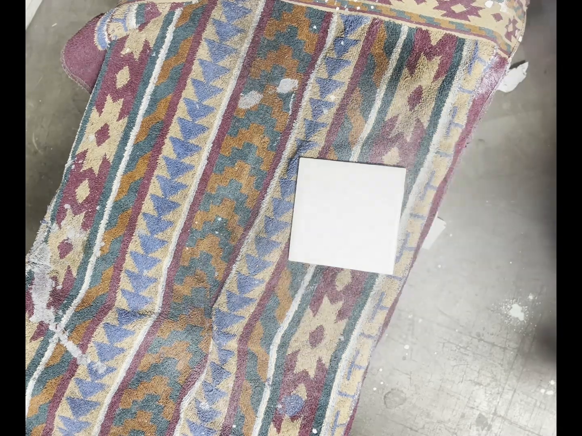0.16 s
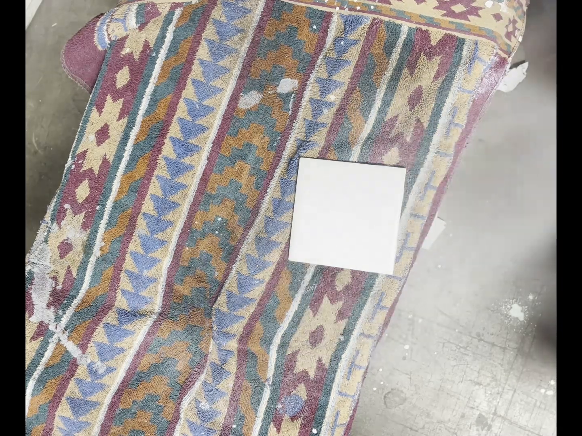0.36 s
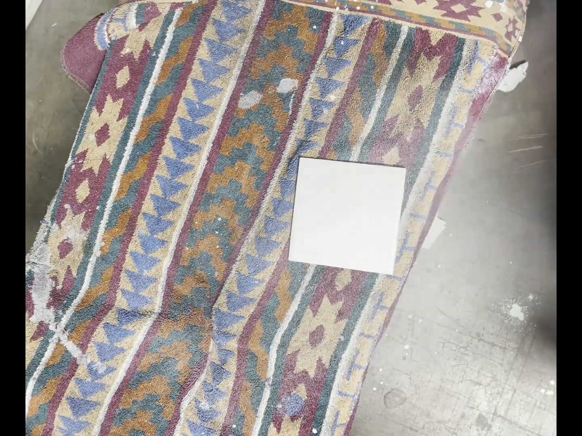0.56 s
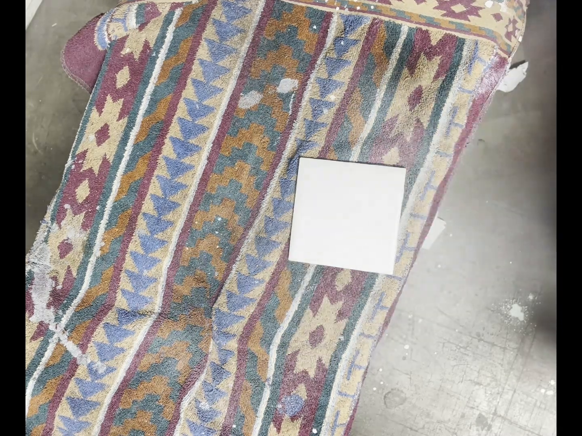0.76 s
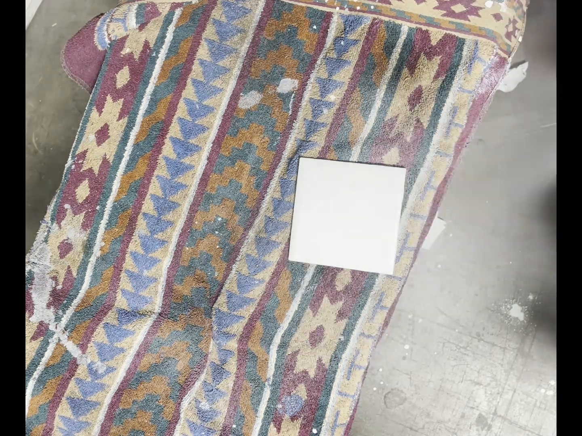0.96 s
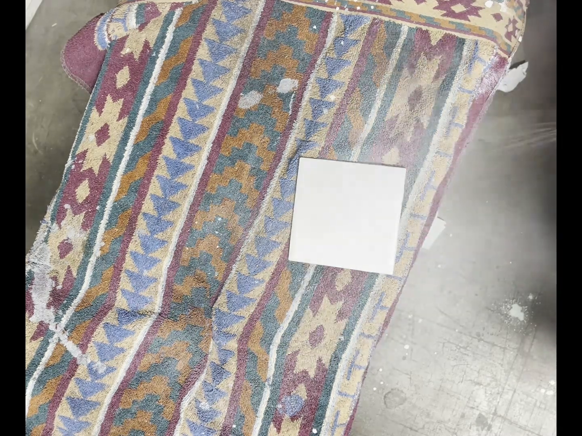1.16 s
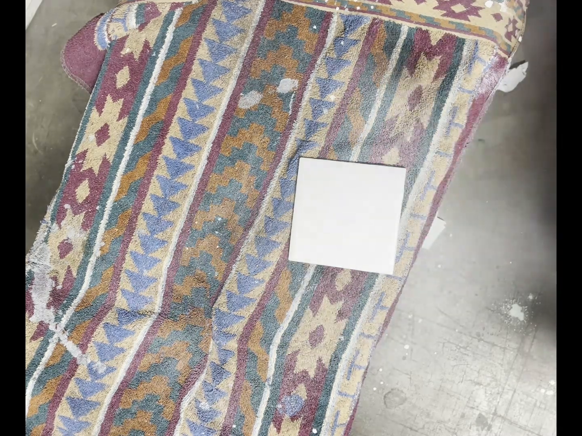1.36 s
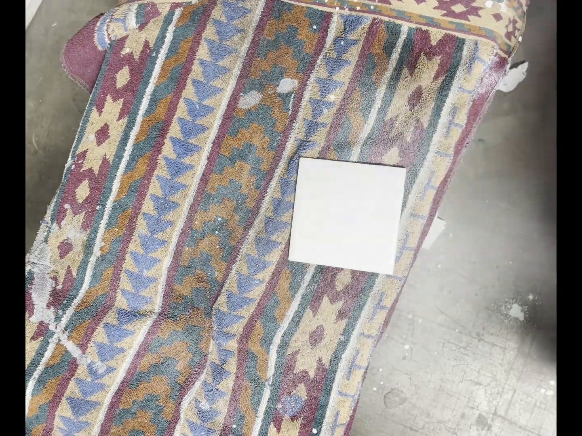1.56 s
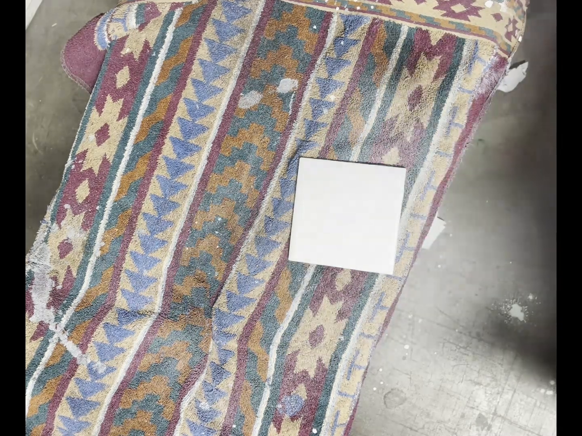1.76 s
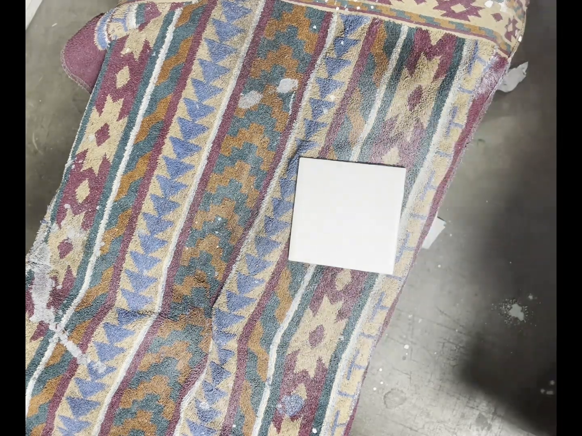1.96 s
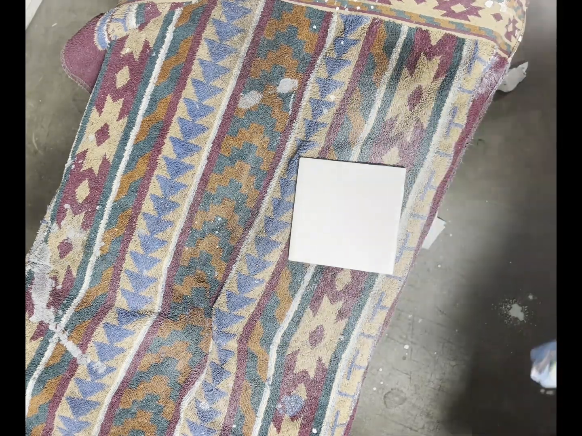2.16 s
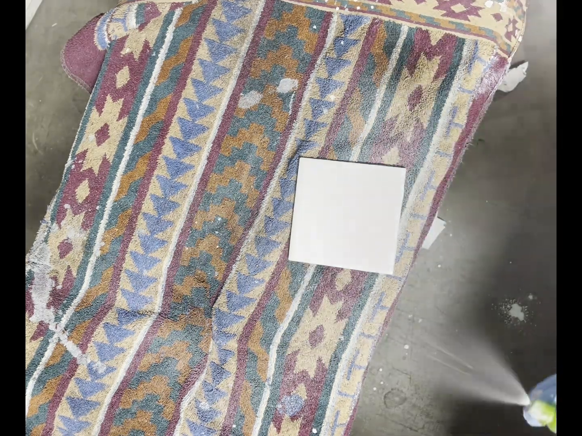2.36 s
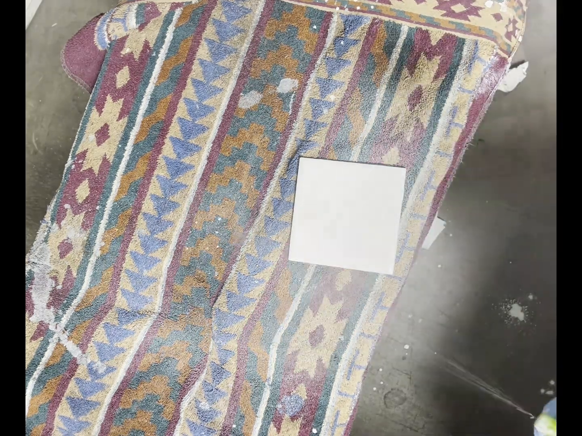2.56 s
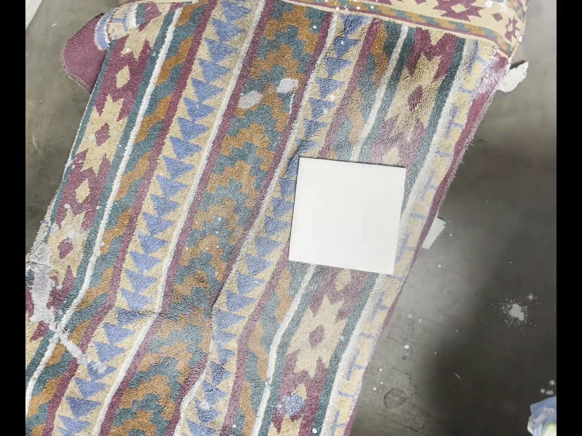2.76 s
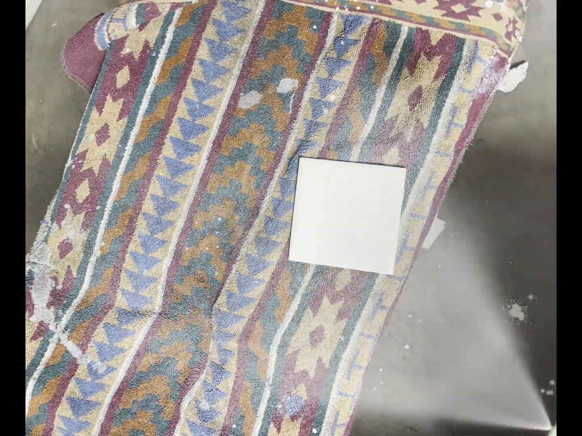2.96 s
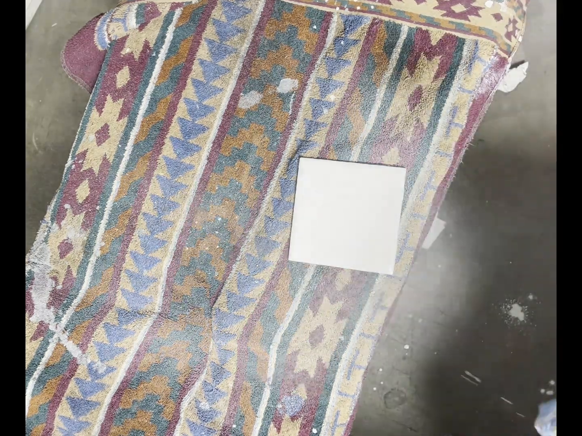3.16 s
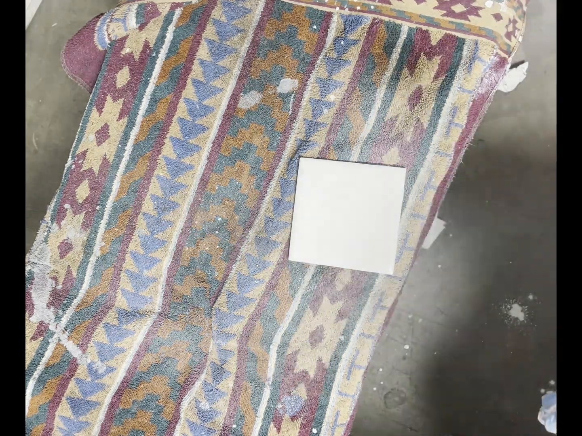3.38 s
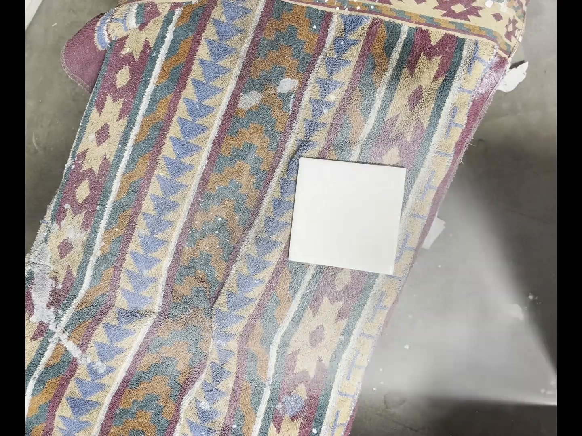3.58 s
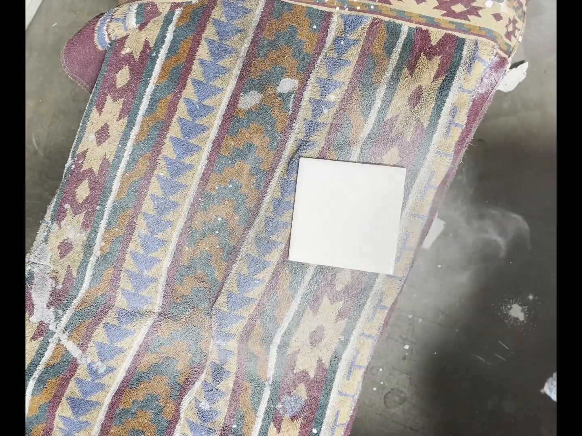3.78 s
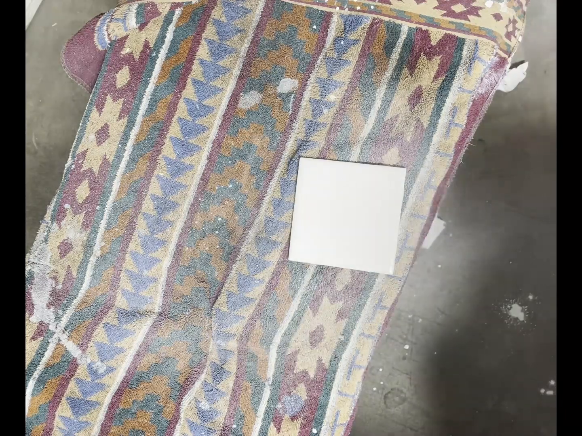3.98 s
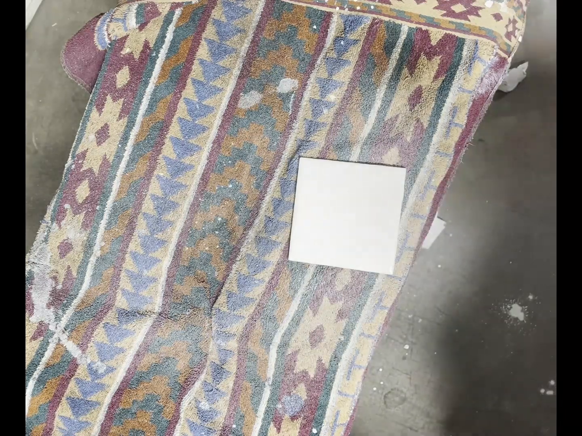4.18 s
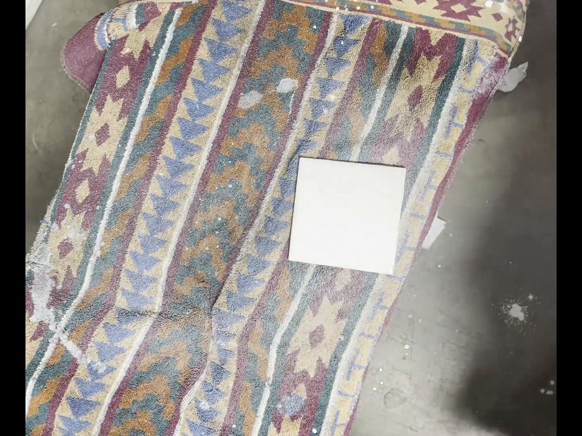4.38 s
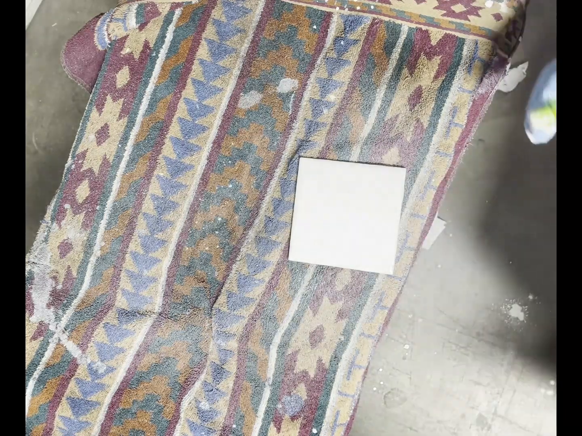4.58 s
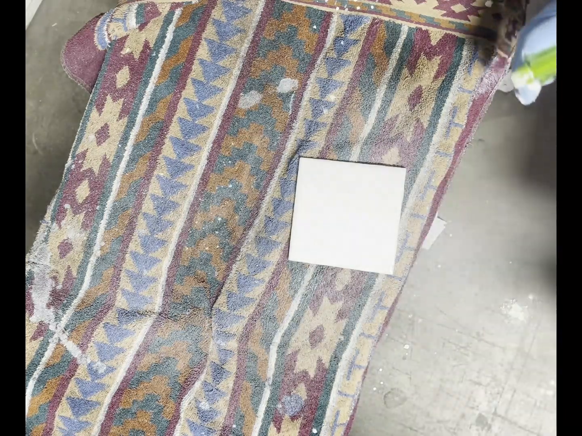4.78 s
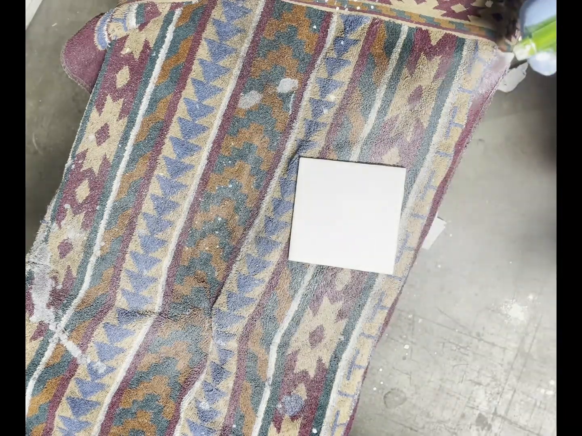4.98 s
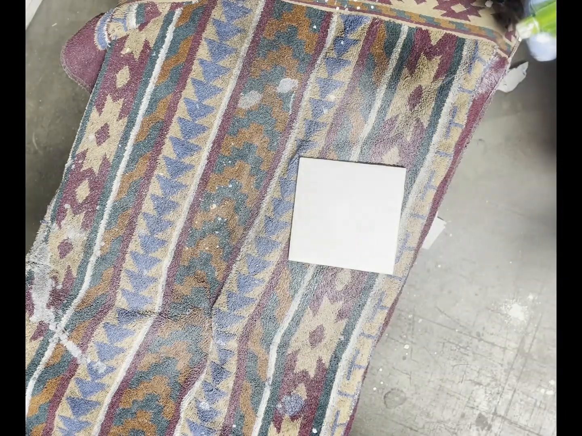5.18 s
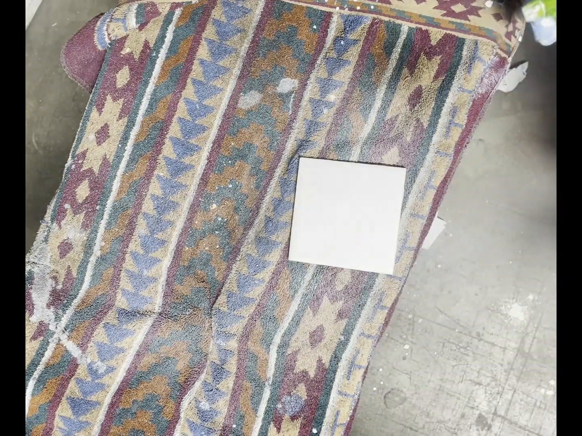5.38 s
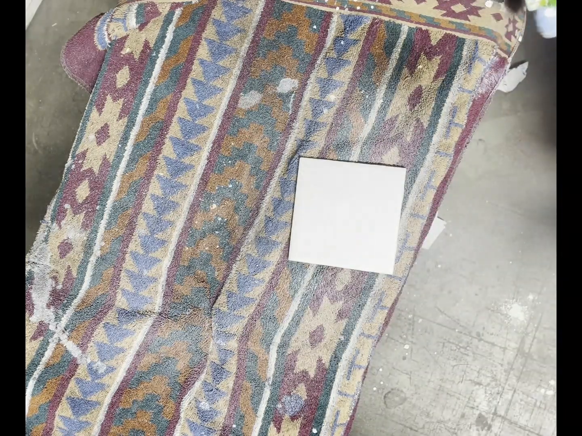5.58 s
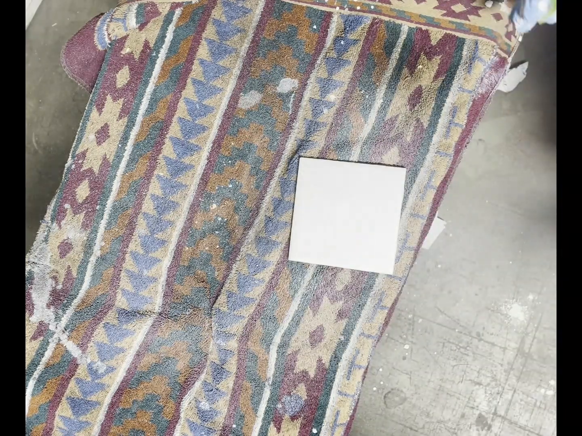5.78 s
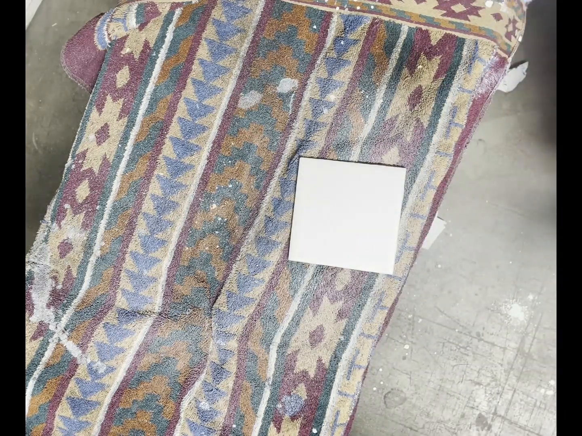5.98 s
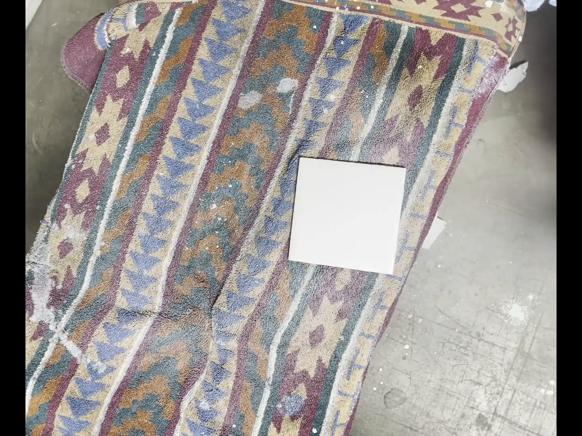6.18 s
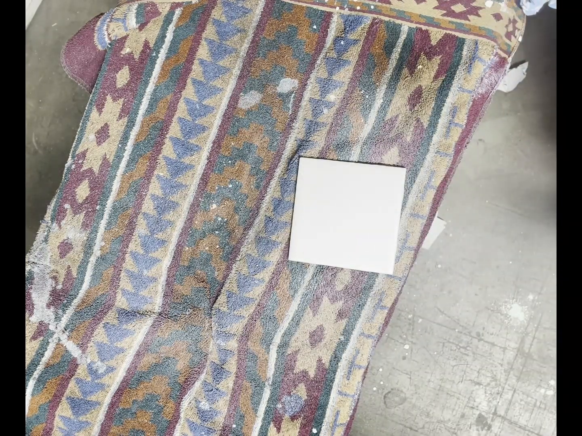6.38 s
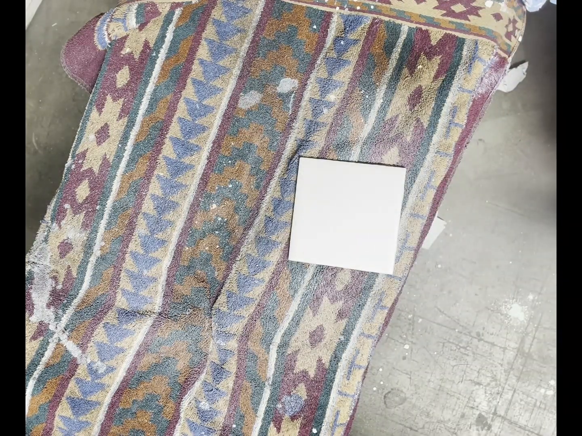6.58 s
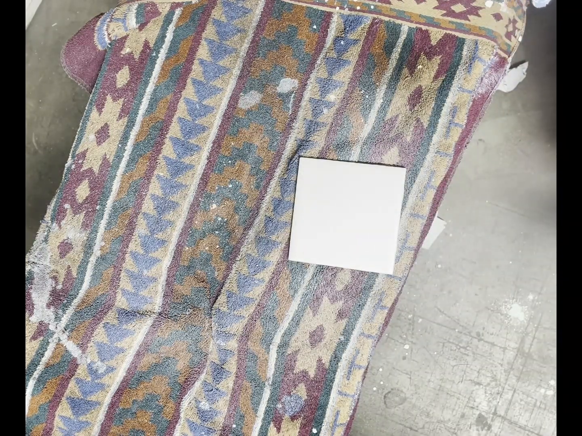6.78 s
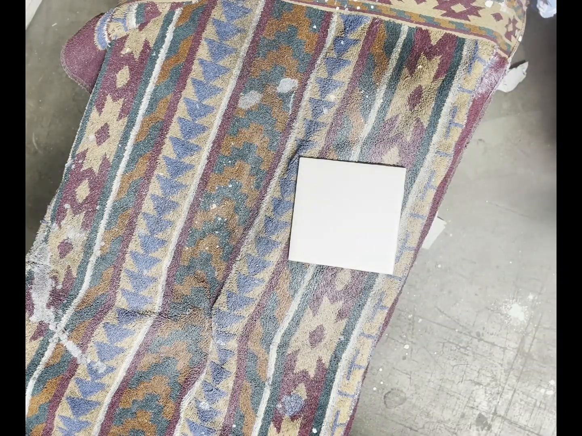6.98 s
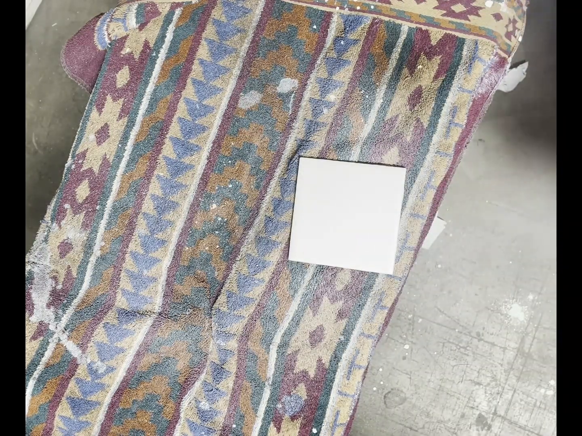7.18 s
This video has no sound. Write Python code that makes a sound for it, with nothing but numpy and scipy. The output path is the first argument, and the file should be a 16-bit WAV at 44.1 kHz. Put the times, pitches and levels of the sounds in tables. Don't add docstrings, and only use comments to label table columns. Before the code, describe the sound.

A trigger spray bottle fires short and longer hissing mists with plastic clacks, over low throbbing ventilation rumble in a hard workshop room.

```python
import sys
import numpy as np
from scipy import signal
from scipy.fft import rfft, irfft
from scipy.io import wavfile
from scipy.ndimage import uniform_filter1d

SR = 44100
rng = np.random.default_rng(int(sys.argv[2]) if len(sys.argv) > 2 else 0)


def master(y):
    cut = np.clip(np.atleast_2d(y).T, -1, 1)
    pcm = np.round(cut * 32767)
    wavfile.write(sys.argv[1], SR, pcm.astype(np.int16))


def attenuation_scalar(level_db):
    decades = np.asarray(level_db, float) / 20
    return 10 ** decades


N = 319092
T = np.arange(N) / SR
HZ = np.maximum(np.fft.rfftfreq(N, 1 / SR), 1)


def on_hz(points):
    hz, value = np.transpose(points)
    return np.interp(np.log(HZ), np.log(hz), value)


def unit(x):
    return x / np.sqrt(np.mean(x ** 2))


def bump(hz, width_hz):
    return np.exp(-.5 * ((HZ - hz) / width_hz) ** 2)


def pair(gain, likeness):
    c = np.clip(likeness, 0, 1)
    mid, side = rfft(rng.standard_normal((2, N))) * gain * np.sqrt([1 + c, 1 - c])
    return unit(irfft(np.array([mid + side, mid - side]), N))


def walk(rate_hz):
    hold = int(SR / rate_hz)
    steps = np.repeat(rng.standard_normal(N // hold + 1), hold)
    return 1.3 * uniform_filter1d(uniform_filter1d(steps, hold), hold)[:N]


def panned(x, pan_db):
    return x * attenuation_scalar(np.array([pan_db, -pan_db]) / 2)


def ping(t, hz, decay_s, phase):
    rise_and_fall = (t / decay_s / 2 * np.exp(1 - t / decay_s / 2)) ** 2
    return rise_and_fall * np.sin(2 * np.pi * (hz * t + phase))


def add_at(out, s, sound):
    start = int(s * SR)
    out[start:start + len(sound)] += sound


# f/Hz, level/dB per Hz
JET = [(290, -61), (500, -22), (836, -24.5), (1130, -16), (1340, -11.5), (2430, -5.5), (3390, -7.5),
       (6810, -10), (9600, -5.5), (11100, -5.5), (11700, -18), (13100, -18.5), (13600, -33.5), (22000, -91)]
# f/Hz, likeness/0-1
LIKE_JET = [(640, 0.4), (1400, 0.7), (3100, 0.5), (6000, 0.4), (8000, 0.93), (10300, .85), (11600, .1),
            (15000, .02)]
# t/s, length/s, level gained/dB
AIRY = [(.35, .06, 5), (1.0, .06, 8), (2.15, .1, 0), (2.492, .05, 12), (2.979, .05, 8.5), (3.57, .08, 10.5),
        (4.623, 0.045, 7), (4.72, .05, -2), (2.41, .03, 6), (3.67, .03, 9), (4.919, .05, 5), (5.05, .05, 5),
        (5.41, .035, 13.5)]


def spray():
    mist_db, coarse_db = pressure()
    middle_db = -7.5 + .39 * coarse_db
    low = 1 / (1 + (HZ / 3800) ** 6)
    high = 1 / (1 + (7500 / HZ) ** 12)
    colour, like = attenuation_scalar(on_hz(JET)), on_hz(LIKE_JET)
    airy_db = sum(db * np.exp(-((T - s) / length_s) ** 4) for s, length_s, db in AIRY)
    sputter_db = .6 * walk(60) + walk(400)
    coarse = pair(colour * low, like) * attenuation_scalar(np.minimum(coarse_db, 6) + .5 * walk(30))
    middle = pair(colour * (1 - low) * (1 - high), like) * attenuation_scalar(middle_db + 2.5)
    mist = pair(colour * high, like) * attenuation_scalar(.5 * walk(30))
    top = pair(bump(14860, 610) * (HZ > 11500), like) * attenuation_scalar(-22.5 + airy_db)
    return attenuation_scalar(mist_db + sputter_db) * (coarse + middle + mist + top)


# peak t/s, fine mist level/dB, rise/s, fall/s, coarse level re mist/dB
STROKES = [(.345, -36.5, 0.04, 0.14, -14), (.695, -52, 0.027, 0.18, -2.5), (.43, -46.5, 0.19, 0.072, -10),
           (.955, -40.5, 0.025, 0.14, -12), (1.0, -35, 0.074, 0.12, -18.5), (1.08, -47, 0.077, 0.052, -3),
           (2.012, -43.5, 0.012, 0.099, 1), (2.07, -43.5, 0.12, 0.092, 2.5),
           (2.115, -32, 0.077, 0.11, -6.5), (2.18, -27, 0.13, 0.18, -6), (2.26, -37.5, 0.12, 0.082, 2),
           (2.485, -36.5, 0.25, 0.052, -10.5), (2.968, -33, 0.06, 0.11, -14.5),
           (3.55, -32.5, 0.05, 0.11, -13.5), (3.62, -38, 0.13, 0.042, -9.5), (4.68, -29, 0.13, 0.29, -8),
           (4.83, -37, 0.25, 0.39, -6), (4.929, -33.5, 0.18, 0.11, -5.5), (5.05, -40, 0.092, 0.07, -7)]
SPITS = [(4.375, -54, .03, .1, 5), (2.485, -36, .03, .035, -28), (3.506, -47.5, .006, .06, -6),
         (.322, -43.5, .008, .05, -10), (2.912, -46, .006, 0.053, -8), (1.969, -43.5, 0.0081, 0.077, -1),
         (1.99, -46, 0.008, .05, 3), (0.487, -56, .1, 0.072, -14), (1.13, -55.5, .1, 0.16, -8),
         (1.509, -42, 0.052, 0.12, -11.5), (1.59, -53.5, 0.071, 0.26, 3.5),
         (1.63, -43.5, 0.18, 0.088, -11.5), (2.54, -52, 0.11, 0.12, -8), (3.08, -56, .1, 0.25, -11),
         (5.11, -62, 0.088, 0.066, -1)]
RUSTLES = [(.1, -82, 3, 5.5, 1.5), (1.83, -56.5, 0.079, 0.71, 1.5), (.62, -75, .1, 0.33, 10),
           (1.26, -71, .05, .12, 5), (2.68, -79, .05, 0.39, 10), (3.27, -78.5, .1, 1.5, 8),
           (3.75, -56, 0.28, 0.082, -19), (3.67, -48.5, .1, 0.17, -12.5), (3.929, -53, 0.1, 0.29, -9.5),
           (4.2, -70, 1.1, 1.5, -3), (4.394, -51, 0.14, 0.18, 1), (4.5, -58, .3, 0.88, -2),
           (5.305, -75, .15, 0.21, 4), (5.395, -46, 0.057, 0.08, -41), (5.417, -37, 0.019, 0.017, -16),
           (5.46, -68.5, .05, 0.67, 16), (5.64, -66.5, 0.059, 0.91, 22), (5.961, -78.5, .4, .6, 8),
           (6.745, -58.5, .02, 0.03, -3), (7.06, -69, 0.16, .1, 8), (7.107, -51.5, 0.053, 0.088, -10.5),
           (7.17, -58.5, 0.2, 3, -7)]


def pressure():
    span_db = 30
    fine_within_db = 14
    tail_coarse_db = .5
    gasps = [(s + .001, db, .014, .05, -10.5) for s, _, _, db, _ in UNLATCHES + SEATS]
    t = T[::32]
    mist_power, coarse_power = 1e-12, 1e-12
    for rows, bend in ((STROKES, 1.74), (SPITS + RUSTLES + gasps, .79)):
        for s, db, rise_s, fall_s, coarse_db in rows:
            under_db = span_db * np.maximum((s - t) / rise_s, (t - s) / fall_s) ** bend
            near = np.exp(-under_db / fine_within_db)
            tilt_db = coarse_db * near + tail_coarse_db * (1 - near)
            mist_power = mist_power + attenuation_scalar(2 * (db - under_db))
            coarse_power = coarse_power + attenuation_scalar(2 * (db - under_db + tilt_db))
    mist_db = 10 * np.log10(mist_power)
    coarse_re_mist_db = 10 * np.log10(coarse_power / mist_power)
    return np.interp(T, t, mist_db), np.interp(T, t, coarse_re_mist_db)


# delay t/s, level/dB
BOUNCES = [
    (.0013, -30.5),
    (.0037, -19.5),
    (.0081, -14.5),
]


def near_bounces():
    comb = 1 + sum(attenuation_scalar(db) * np.exp(-2j * np.pi * HZ * s) for s, db in BOUNCES)
    return comb / np.sqrt(np.mean(np.abs(comb) ** 2))


def clacks():
    out, t = np.zeros(N + 4000), np.arange(4000) / SR
    body_s, edge_s = .00035, .00014
    band = signal.butter(3, [1400, 3900], "band", fs=SR, output="sos")
    for s, db, body_hz, edge_db in trigger():
        phase_1, phase_2, phase_3, spread, low, high = rng.random(6)
        rattle = rng.standard_normal(len(t)) * np.exp(-t / .0034) * (1 - np.exp(-t / .00073))
        body = ping(t, body_hz, body_s, phase_1)
        body += .5 * ping(t, body_hz * (1.15 + .25 * spread), .65 * body_s, phase_2)
        body += 2 * attenuation_scalar(-6) * signal.sosfilt(band, rattle)
        edge = ping(t, 8170 * (.95 + .1 * low), edge_s, phase_2)
        edge += .6 * ping(t, 10800 * (.95 + .1 * high), 1.2 * edge_s, phase_3)
        body_share = np.sqrt(max(1 - attenuation_scalar(2 * edge_db), .06))
        edge_share = min(attenuation_scalar(edge_db), 1)
        add_at(out, s, attenuation_scalar(db - 3) * (body_share * body + edge_share * edge))
    return out[:N] * np.ones((2, 1))


# t/s, peak level/dB, body f/Hz, edge level re body/dB
GRIPS = [(.3184, -42, 2030, 4), (.6833, -45, 2240, 3), (.9263, -34, 2650, 3), (1.5184, -32.5, 1750, -1.5),
         (1.8153, -46, 2980, -9), (1.8836, -36, 1650, -22), (1.9025, -41, 1860, -20),
         (1.9664, -34.5, 2520, -4), (1.9875, -40.5, 2430, -3), (2.0078, -29, 1700, -20),
         (2.9068, -34.5, 1600, -1), (3.4685, -43.5, 1950, -1.5), (3.5028, -39, 2100, 3),
         (3.582, -32, 2100, 3), (4.3904, -43.5, 1460, -14), (4.5392, -26, 2780, -8),
         (4.5393, -26.5, 1650, -25), (4.5436, -31, 2550, -12)]
# t/s, peak level/dB, body f/Hz, edge level re body/dB
TICKS = [(.942, -38, 2200, 3), (1.1745, -38, 1970, -1), (2.82, -54.5, 2600, -15), (3.396, -51, 2820, -6),
         (3.7775, -37.5, 2300, -1), (3.914, -47, 2410, -18), (4.0369, -37, 2540, -21.5),
         (4.0655, -49, 2370, -25), (4.1032, -42.5, 2590, -30), (4.1565, -39, 2030, -20),
         (4.161, -46.5, 2840, -20), (5.1054, -47, 3220, 1.1), (5.2969, -38.5, 3280, -3),
         (5.3198, -43, 2520, 5), (5.3664, -40, 2750, 3), (5.3832, -37, 2570, 3), (5.388, -42, 1580, 3),
         (5.4048, -33, 1490, 0.5), (5.4123, -24.5, 2300, -1.5), (5.4145, -30, 1760, -2.5),
         (5.5164, -47.5, 2000, -10), (6.7427, -35.5, 2000, -2.5), (6.7468, -39, 2850, -3),
         (7.0474, -49, 2240, -13), (7.0579, -45, 2300, -9), (7.111, -49, 2040, -4),
         (7.1783, -37, 2000, -19)]
# t/s, peak level/dB, slack tick re peak/dB, air gasp level/dB, edge level re body/dB
UNLATCHES = [
    (0.5392, -33, -8, -44, -0.5),
    (1.1860, -34, -12, -45, 0),
    (2.591, -30, -4.5, -48, -2),
    (3.1363, -42, 9, -46.5, 6),
    (3.6926, -29, -12, -45.5, 6),
    (5.164, -35.5, 3, -47.5, -1.5),
    (5.5594, -43, -15, -45.5, 1.5),
]
# t/s, peak level/dB, rebound re peak/dB, air gasp level/dB, edge level re body/dB
SEATS = [
    (0.5671, -35, 1, -47, -0.5),
    (1.218, -36, 0, -48.5, -1.5),
    (2.6194, -33.5, 0, -44.5, -1),
    (3.1710, -35.5, -2.5, -48.5, -2.5),
    (3.7301, -38, 5.5, -45, -1.5),
    (5.1950, -32.5, 2.5, -42.5, -1.5),
    (5.5978, -31.5, -2, -47.5, -1),
]


def trigger():
    rows = GRIPS + TICKS
    for s, db, slack_db, _, edge_db in UNLATCHES:
        rows = rows + [(s, db, 2000, edge_db), (s - .0052, db + slack_db, 2000, edge_db + 4)]
    for s, db, rebound_db, _, edge_db in SEATS:
        rows = rows + [(s, db, 2883, edge_db), (s + .0075, db + rebound_db, 2883, edge_db)]
    return rows


# t/s, peak level/dB, f/Hz, slosh level/dB
KNOCKS = [
    (1.956, -42, 311, -40),
    (2.24, -47, 610, -43),
    (2.907, -38.5, 336, -41),
    (3.68, -50, 800, -38),
    (4.993, -40, 490, -41),
    (5.414, -34.5, 304, -33),
    (5.53, -43, 330, -56),
    (5.675, -43, 267, -38),
    (5.75, -54, 300, -44),
]


def knocks():
    out, t = np.zeros(N + 4000), np.arange(4000) / SR
    soft_start = 1 - np.exp(-t / .0019)
    for s, db, hz, slosh_db in KNOCKS:
        band = signal.butter(2, hz * np.array([.46, 2.05]), "band", fs=SR, output="sos")
        slosh = unit(signal.sosfilt(band, rng.standard_normal(len(t)))) * np.exp(-t / .013)
        ring = np.sin(2 * np.pi * hz * t) + .5 * np.sin(2 * np.pi * 1.7 * hz * t)
        ring *= np.exp(-t / .0096)
        add_at(out, s, (attenuation_scalar(db - 4.5) * ring + attenuation_scalar(slosh_db - 9) * slosh) * soft_start)
    return out[:N] * np.ones((2, 1))


# t/s, level/dB
REFILL = [(.58, -95), (.62, -76), (.85, -79), (.9, -95), (3.18, -95), (3.22, -81), (3.44, -82), (3.47, -95),
          (5.2, -95), (5.23, -73), (5.36, -75), (5.42, -85), (5.46, -66), (5.62, -64), (5.78, -64),
          (5.9, -68.5), (6.1, -69.5), (6.235, -72), (6.26, -95)]
# f/Hz, width/Hz, level/dB
CHAMBER = [
    (1990, 35, -4.5),
    (2590, 80, -6.5),
    (2840, 65, 2),
    (3155, 120, -8),
    (3680, 130, -13),
]


def refill():
    s, db = np.transpose(REFILL)
    colour = sum(attenuation_scalar(g_db) * bump(hz, width_hz) for hz, width_hz, g_db in CHAMBER)
    return pair(colour, 1 + 0 * HZ) * attenuation_scalar(np.interp(T, s, db, -140, -140) + .9 * walk(23))


# start t/s, length/s, from f/Hz, to f/Hz, level/dB
WHISTLES = [(.62, .06, 8400, 8600, -73), (.81, .11, 8900, 8300, -73), (.85, .07, 11950, 11400, -75),
            (3.23, .05, 10700, 11400, -73), (3.27, .07, 11350, 10950, -72), (3.4, .06, 12100, 11700, -74),
            (5.47, .09, 5650, 6200, -67), (5.67, .05, 8000, 7950, -71), (5.73, .13, 6400, 6500, -68),
            (5.71, .14, 15700, 15600, -81), (5.84, .07, 15600, 14300, -79), (5.9, .06, 14200, 14000, -80),
            (5.67, .28, 13300, 13000, -83), (6.0, .1, 13100, 13150, -80), (6.09, .12, 13100, 11800, -79),
            (6.2, .06, 11900, 10800, -78), (5.79, .07, 10800, 10600, -73)]


def whistles():
    out = np.zeros(N)
    for s, length_s, from_hz, to_hz, db in WHISTLES:
        glide_hz = np.interp(T, [s, s + length_s], [from_hz, to_hz])
        pitch_hz = glide_hz * (1 + .0025 * walk(150) + .004 * walk(30))
        gate = np.clip(np.minimum(T - s, s + length_s - T) / .015, 0, 1)
        out += gate * attenuation_scalar(db + 2.5 * walk(60)) * np.sin(2 * np.pi * np.cumsum(pitch_hz) / SR)
    return out


def room(x):
    t60_s, level_db = .19, -7
    t = np.arange(int(.5 * SR)) / SR
    tail = rng.standard_normal((2, len(t))) * 1000 ** (-t / t60_s) * (t > .004)
    tail = signal.lfilter([1], [1, -.4], tail)
    tail = tail / np.sqrt(np.sum(tail[0] ** 2))
    return attenuation_scalar(level_db) * signal.fftconvolve(x, tail, axes=1)[:, :N]


# t/s, air flow level/dB, fan line level re flow/dB
VENT = [(0.0, -57.5, -4), (0.64, -48.5, -14), (1.15, -48.5, -21.5), (1.57, -49, -4.5), (1.85, -44.5, -15),
        (3.67, -44, -10), (3.81, -45, -33), (3.91, -46.5, -6), (4.19, -38.5, -10), (4.63, -46, -8),
        (4.74, -42.5, -23), (4.98, -41, -6.5), (5.1, -42.5, -14.5), (6.49, -46, -4), (6.911, -42.5, -7),
        (7.03, -46, -4), (7.24, -41, -30)]
# f/Hz, level/dB per Hz
RUMBLE = [(20, -22), (30, 8.5), (45, 9.5), (62, 13.5), (90, 10), (115, 9), (132, -5.5), (170, -5.5),
          (240, -42.5)]
# f/Hz, level/dB per Hz
AIR = [(100, -11), (160, -9), (246, -11.5), (300, -14), (740, -16), (850, -21.5), (1100, -27.5),
       (2000, -39), (4000, -71.5)]
# f/Hz, width/Hz, level/dB
HUM = [
    (65, 10, -50.5),
    (240, 6, -68.5),
]
# f/Hz, likeness/0-1
LIKE_AIR = [(60, 0.97), (130, 0.8), (290, 0.79), (640, 0.3), (1400, 0), (7000, 0.2), (9000, .6)]


def vent():
    s, *columns = np.transpose(VENT)
    flow_db, fan_db = (np.interp(T, s, c) for c in columns)
    change_db = flow_db - flow_db.mean()
    like = on_hz(LIKE_AIR)
    rumble = pair(attenuation_scalar(on_hz(RUMBLE)), like) * attenuation_scalar(flow_db - 1 + walk(8.7))
    air = pair(attenuation_scalar(on_hz(AIR)), like) * attenuation_scalar(-56.5 + .12 * change_db + 2 * walk(9.9))
    hum = 0
    for hz, width_hz, db in HUM:
        hum = hum + attenuation_scalar(db + .5 * change_db) * pair(bump(hz, width_hz), .96 + 0 * HZ)
    fan_hz = 144.4 * (1 + .01204 * walk(12))
    fan = np.sin(2 * np.pi * np.cumsum(fan_hz) / SR) * attenuation_scalar(flow_db + fan_db + 3.3 * walk(14))
    return panned(rumble + hum + fan, np.array([1.3])) + air


# f/Hz, level/dB per Hz
MIC_FLOOR = [(800, -0.5), (2000, 22.5), (4500, 3.5), (7500, 18), (11500, -32.5), (12500, 13), (13000, -16)]


def microphone_hiss():
    band = bump(6100, 330) + .3 * bump(6100, 1000)
    left_hiss = attenuation_scalar(-66.5) * pair(band, 0 * HZ) * [[1], [.2]]
    return left_hiss + attenuation_scalar(-100) * pair(attenuation_scalar(on_hz(MIC_FLOOR)), on_hz(LIKE_AIR))


def patchy(x, guide, from_hz, keep_db, bar_slope, scatter_db):
    hz, _, both = signal.stft(np.array([x, guide]), SR, nperseg=2048)
    below = (hz > 8000) & (hz < 11500)
    below_db = 10 * np.log10(np.mean(np.abs(both[1, below]) ** 2, axis=0) + 1e-18)
    bar_db = keep_db + bar_slope * np.maximum(below_db + 95, 0)
    cells = both[0] * (hz < 15850)[:, None]
    band = ((hz - from_hz) // 700).astype(int)
    luck = rng.standard_normal((30, cells.shape[1]))
    for b in range(band.max() + 1):
        peak_db = 20 * np.log10(np.max(np.abs(cells[band == b]), axis=0) + 1e-12)
        ease_db = 0
        if b == 0:
            ease_db = 13 - .4 * np.maximum(below_db + 85, 0)
        elif b == 1:
            ease_db = 4
        short_db = bar_db + scatter_db * luck[b] - ease_db - peak_db
        cells[band == b] /= 1 + attenuation_scalar(np.clip(5 * short_db, -100, 100))
    return signal.istft(cells, SR, nperseg=2048)[1][:N]


# f/Hz, left minus right level/dB
SPRAY_SIDE = [(700, -2), (1300, -3), (2400, 3.5), (4400, 5.5), (7000, 5), (8500, 1.5)]


def scene():
    hits = clacks() + knocks()
    bottle = rfft(spray()) * near_bounces() + rfft(hits + whistles() + refill())
    return irfft(panned(bottle, on_hz(SPRAY_SIDE)), N) + room(hits) + vent()


def band_limit(x):
    return signal.sosfilt(signal.butter(12, 16760, fs=SR, output="sos"), x)


def record(dry):
    slot = attenuation_scalar(-24 * bump(10270, 120))
    left, right = irfft(rfft(dry + microphone_hiss()) * slot, N)
    mid, side = (left + right) / 2, (left - right) / 2
    kept_mid = patchy(mid, mid, from_hz=11750, keep_db=-87, bar_slope=.68, scatter_db=3)
    kept_side = patchy(side, mid, from_hz=7700, keep_db=-94, bar_slope=.97, scatter_db=5)
    return band_limit(np.array([kept_mid + kept_side, kept_mid - kept_side]))


dry = scene()
out = record(dry)
master(out)
```